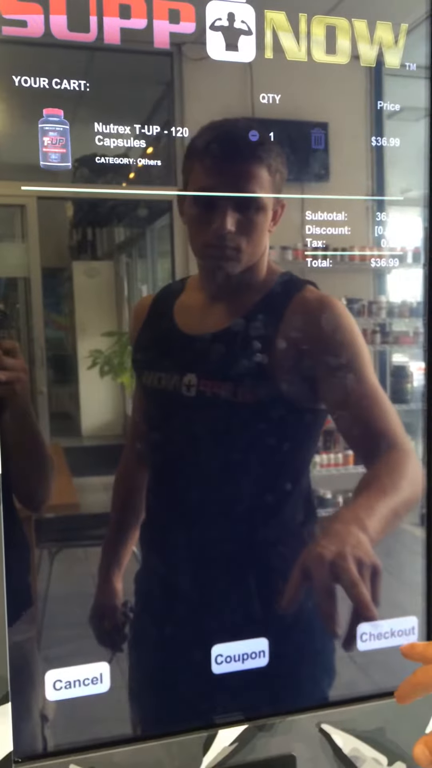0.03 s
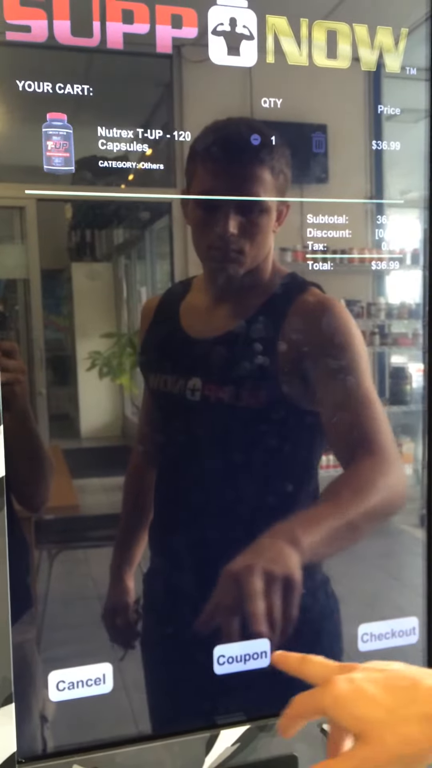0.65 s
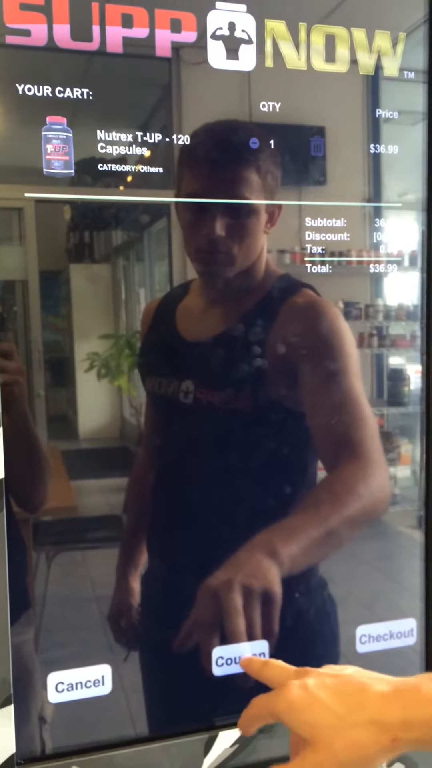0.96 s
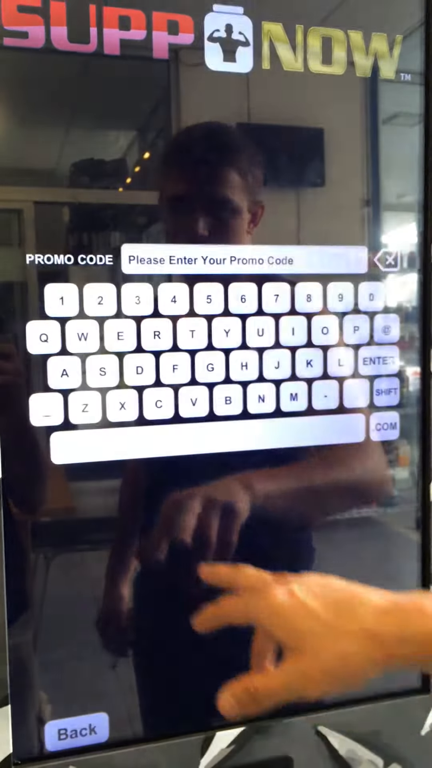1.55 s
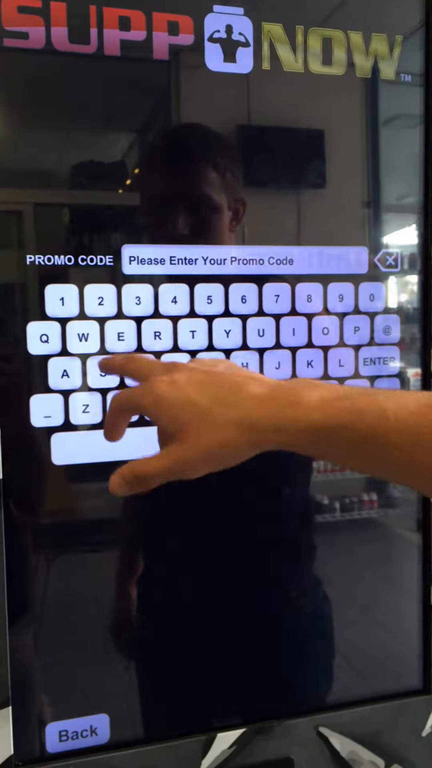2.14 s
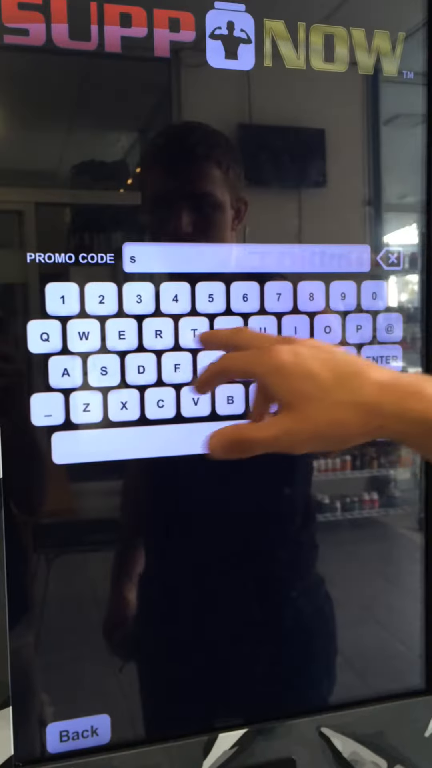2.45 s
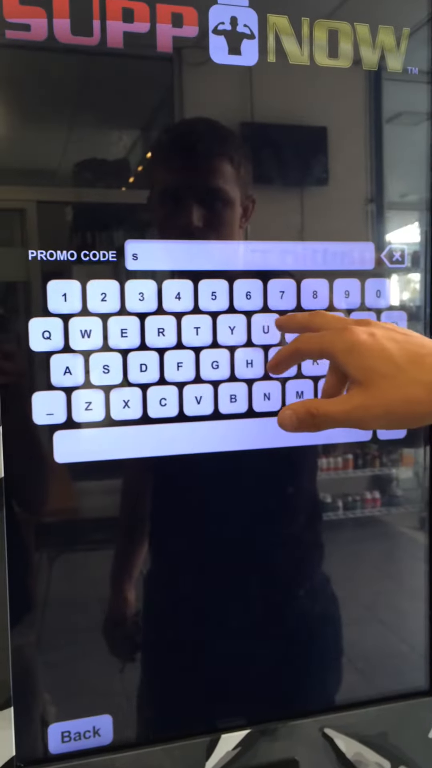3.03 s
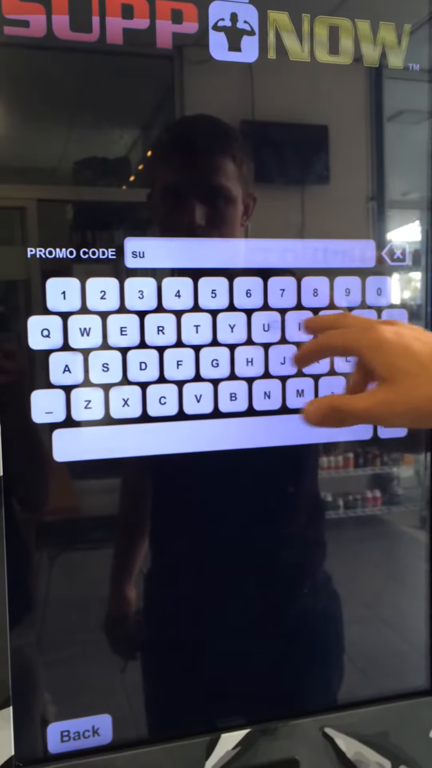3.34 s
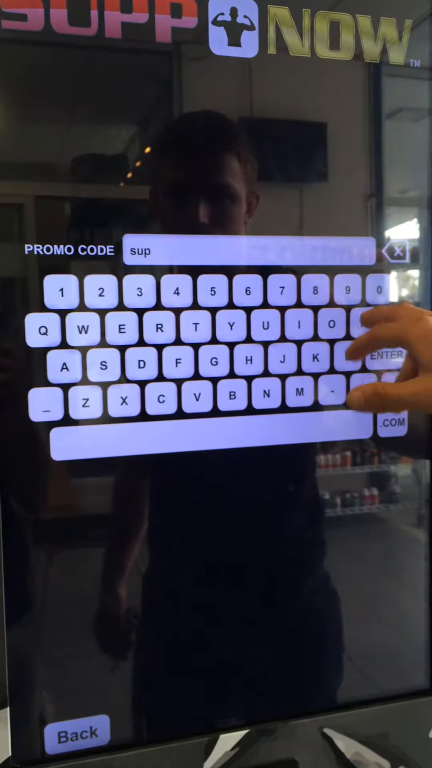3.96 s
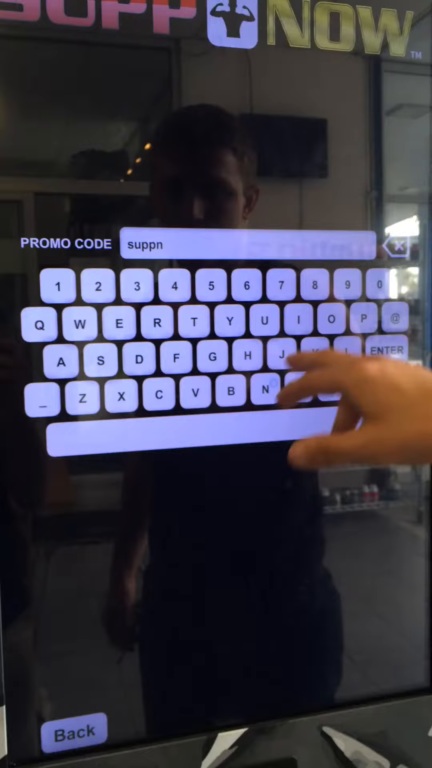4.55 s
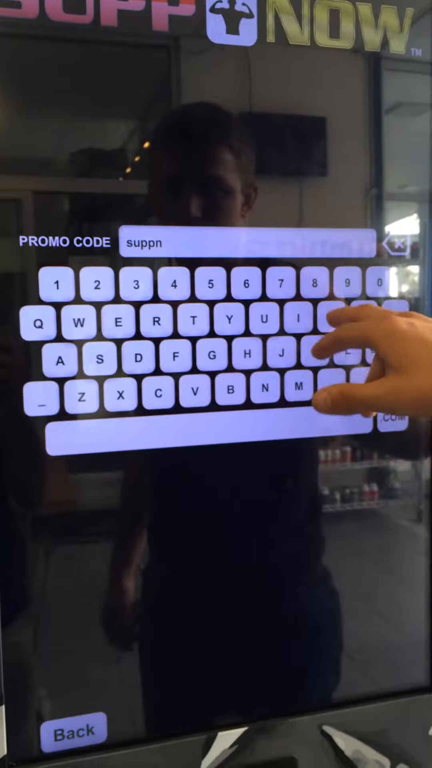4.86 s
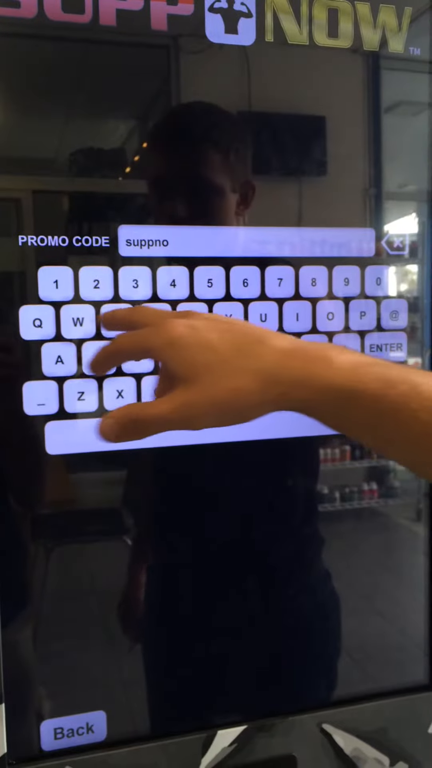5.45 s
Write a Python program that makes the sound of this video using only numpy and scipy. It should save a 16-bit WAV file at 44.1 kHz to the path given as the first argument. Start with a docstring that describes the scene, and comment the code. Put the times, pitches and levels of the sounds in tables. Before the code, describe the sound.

A vending machine hums steadily in a hard-floored lobby, with a thin compressor buzz and soft fan air, heard from a phone close by. After a second, a finger touches the big screen with faint swishes and a nail tick, and the pane clacks twice against its frame. Spaced, low thumps of typing follow. Around four seconds come another tick and a clack, then two last soft touches.

```python
"""A vending machine in a hard-floored lobby, heard from a phone close by.
From the start the machine hums, its compressor buzzes thinly and its fan pushes air.
A second in, a finger starts typing on the big touchscreen: each touch booms the panel, and skin
swishes on the glass. A fingernail ticks and the pane clacks twice against its frame, a lighter knock
between. Near four seconds come another tick, a clack and a faint knock, then the last touches."""
import sys
import numpy as np
from scipy import signal
from scipy.fft import rfft, irfft, next_fast_len
from scipy.io import wavfile
from scipy.ndimage import map_coordinates

SR = 44100
rng = np.random.default_rng(int(sys.argv[2]) if len(sys.argv) > 2 else 0)


def store_wav(level_fs):
    """Save 16-bit WAV to argv[1]."""
    pcm = np.round(np.clip(np.atleast_2d(level_fs), -1, 1) * 32767)
    wavfile.write(sys.argv[1], SR, pcm.T.astype(np.int16))


N = 246959
TIME = np.arange(N) / SR
RING_TIME = TIME[:SR]  # each blow gets one second to ring out

# The pane knocks on its frame. Each row: start in seconds, level in dB, hardness as tilt in dB per
# octave, jolt to the panel in dB, signed gain of a second boom 19.5 ms after the jolt.
CLACKS = [(1.2040, -3.5, 0, -28, 0.06), (1.285, -14.5, -3.5, -35, -0.2), (1.3390, 0, -0.96, -23, -1.06),
          (4.1697, -2, -0.5, -32, 0), (4.2680, -19, -7, -35.5, -0.1)]


def undb(db):
    """Decibels to gain."""
    return 10 ** (np.asarray(db) / 20)


def fade(t60):
    """One second of exponential decay, falling 60 dB in t60 seconds."""
    return np.exp(-np.log(1000) * RING_TIME / t60)


def colour(x, points):
    """Filter causally with a spectrum of (Hz, dB) points, joined over log frequency."""
    size = 2 * next_fast_len(len(x))
    hz = np.arange(size // 2 + 1) * SR / size
    point_hz, point_db = np.transpose(points)
    gain = undb(np.interp(np.log(np.maximum(hz, 1)), np.log(point_hz), point_db))
    cepstrum = irfft(np.log(gain))
    cepstrum[1:size // 2] *= 2  # fold to minimum phase
    cepstrum[size // 2 + 1:] = 0
    return irfft(rfft(x, size) * np.exp(rfft(cepstrum)))[:len(x)]


def band(x, lo_hz, hi_hz, order=1):
    """Band-pass."""
    return signal.sosfilt(signal.butter(order, [lo_hz, hi_hz], "band", fs=SR, output="sos"), x)


def walk(rate):
    """Random drift with a spread near 1, turning `rate` times a second."""
    knots = rng.standard_normal(256)
    return np.interp(TIME * rate, np.arange(len(knots)), knots)


def add(track, s, sound):
    """Mix a sound into a track at s seconds."""
    i = int(s * SR)
    track[i:i + len(sound)] += sound[:len(track) - i]


def tone(hz, db, flutter_db, wander_hz, wander_rate=12):
    """A running machine's tone, unsteady in level and pitch."""
    phase = 2 * np.pi * (np.cumsum(hz + wander_hz * walk(wander_rate)) / SR + rng.random())
    return np.sqrt(2) * undb(db + flutter_db * walk(7)) * np.sin(phase)


def drone(hz, width_hz, db):
    """A resonance shaken at random swells and fades."""
    shaken = band(rng.standard_normal(N), hz - width_hz / 2, hz + width_hz / 2)
    return undb(db) * shaken / np.std(shaken)


def hum():
    """Motor and mains hum while sheet metal drones in the air stream."""
    # Motor and mains tones. Each row: pitch in Hz, rms level in dB, flutter in dB, wander in Hz.
    tones = [(67.6, -64, -9, 2.38), (81.2, -58, 7.5, 0.47), (98.5, -63.5, 1.5, 2.7),
             (119.74, -45.5, -1, 0.12), (545, -87.5, 16, 0.77), (1455, -69.5, 1, 0.94)]
    # Sheet-metal resonances. Each row: centre in Hz, width in Hz, rms level in dB.
    sheets = [(158.9, 14, -55), (230.9, 10.5, -58)]
    return sum(tone(*row) for row in tones) + sum(drone(*row) for row in sheets)


def compressor(turn_hz=58.9, rattle_db=-63.5):
    """The same tiny rattle rings the shell on every shaft turn; thin wavering tones stand out."""
    # The compressor's whine. Each row: pitch in Hz, rms level in dB.
    whine_tones = [(3020, -83.5), (3198, -86), (3257, -87), (4651, -87), (4705, -83.5), (5001, -85),
                   (5346, -83.5), (5464, -89), (5814, -87.5), (6040, -88), (6568, -90), (7031, -89),
                   (7381, -91), (7671, -91), (7962, -86), (8021, -85), (8484, -88), (14955, -101)]
    # Shell resonances that colour the buzz. Each row: frequency in Hz, gain in dB.
    shell = [(2500, -20), (3100, 0), (3900, -14), (4800, -2), (6000, -2), (6900, -8), (7700, -6), (8000, 1),
             (8450, 2), (8900, -10), (10800, -14), (13000, -26)]
    size = int(SR / turn_hz)
    rattle = irfft(np.exp(2j * np.pi * rng.random(size // 2 + 1))) * np.sqrt(size)
    turns = np.cumsum(turn_hz * (1 + .0011 * walk(9.9))) / SR
    buzz = map_coordinates(rattle, [turns % 1 * len(rattle)], order=3, mode="grid-wrap")
    whine = sum(tone(hz, db, flutter_db=3.2, wander_hz=4, wander_rate=30) for hz, db in whine_tones)
    return undb(rattle_db) * colour(buzz, shell) + whine


def fan(rest_db=1.4, swell_db=2.5, swell_s=2.63, spread_s=0.15):
    """Broad air noise whose middle range flutters a little and swells once."""
    # Fan air in the lobby. Each row: frequency in Hz, density in dB per Hz before the middle is lifted.
    spectrum = [(20, -80.5), (48, -73), (95, -70.5), (175, -69.5), (260, -75), (520, -86), (1100, -91),
                (1600, -92.5), (2700, -98.5), (4000, -106.5), (8300, -110), (9400, -116), (11000, -116),
                (14000, -121)]
    air = colour(rng.standard_normal(N), spectrum) * np.sqrt(SR / 2)
    middle = band(air, 290, 3800)
    swell = np.exp(-((TIME - swell_s) / spread_s) ** 2)
    lift_db = rest_db + swell_db * swell + .5 * walk(12)
    return air + (undb(lift_db) - 1) * middle


def ring(modes):
    """Struck modes dying away."""
    return sum(undb(db) * fade(t60) * np.sin(2 * np.pi * hz * RING_TIME) for hz, db, t60 in modes)


def thump(db, tilt_db):
    """One blow on the panel; its evenly spaced low modes beat, so the boom throbs about every 35 ms."""
    # The panel's bending modes. Each row: frequency in Hz, relative level in dB, t60 in seconds.
    bending = [(51.3, -2.5, 0.34), (74, 2, 0.24), (100.1, 2.5, 0.42), (128.3, 4, 0.26), (155.35, 3, 0.25),
               (171.6, -16.5, 1), (200.6, -13, 0.58), (237, -32, 0.44), (320.3, -2.5, 0.16),
               (454, -22, 0.2)]
    modes = [(hz, mode_db + tilt_db * np.log2(hz / 140), t60) for hz, mode_db, t60 in bending]
    boom = band(ring(modes), 129, 162.4)  # the cabinet behind the panel favours one broad band
    lobby = band(rng.standard_normal(len(RING_TIME)), 97, 300, order=2) * fade(0.54) * (1 - fade(0.07))
    return undb(db) * (boom + undb(-5) * lobby)


def boom_pair(db, tilt_db, second_gain, lag_s=.0195):
    """A boom, and a second just after it that changes which low note of the panel rings on."""
    out = thump(db, tilt_db)
    add(out, lag_s, second_gain * thump(db, tilt_db))
    return out


def panel(rebound_s=.037, rebound_db=-24.5):
    """Fingertips boom the panel; each knock of the pane jolts it too, and it swings back."""
    # Finger on the panel. Each row: start in seconds, level in dB, direction (1 in, -1 springing back),
    # hardness as tilt in dB per octave, signed gain of a second boom 19.5 ms later.
    touches = [(1.0403, -27.5, -1, 4, 0.22), (1.1250, -31, 1, 1, 0), (1.1692, -31, -1, -1, 0.12),
               (2.1791, -28.5, 1, -1.5, -1.58), (2.308, -38, -1, -2, 0.048), (3.2391, -20.5, 1, -2, 0.045),
               (3.7638, -20.5, 1, 3.5, 0.077), (4.0108, -21, 1, 2, 0.14), (4.4398, -24, 1, -1, -0.066),
               (4.9169, -34.5, 1, 5, 0.054)]
    out = np.zeros(N)
    for s, db, direction, tilt_db, second_gain in touches:
        add(out, s, direction * boom_pair(db, tilt_db, second_gain))
    for s, db, _, jolt_db, second_gain in CLACKS:
        add(out, s, -boom_pair(jolt_db, tilt_db=4, second_gain=second_gain))
        add(out, s + rebound_s, thump(db + rebound_db, tilt_db=-1))
    return out


def skim():
    """Soft swishes as skin rubs over the glass."""
    # Each row: middle and spread in seconds, gain in dB, low and high band edges in Hz.
    swishes = [(1.1, 0.061, -47, 2170, 3000), (1.12, 0.027, -19, 212, 270), (1.159, 0.062, -38, 440, 1410),
               (4.96, 0.11, -55, 5800, 6900)]
    out = np.zeros(N)
    for s, spread_s, db, lo_hz, hi_hz in swishes:
        envelope = np.exp(-((TIME - s) / spread_s) ** 2)
        out += undb(db) * envelope * band(rng.standard_normal(N), lo_hz, hi_hz, order=2)
    return out


def burst(contact_t60, scatter_db, scatter_t60, room_db, room_t60):
    """A hard contact, its reflections off the cabinet, then the lobby's tail."""
    scatter = undb(scatter_db) * fade(scatter_t60)
    room = undb(room_db) * fade(room_t60)
    power = fade(contact_t60) ** 2 + scatter ** 2 + room ** 2
    return np.sqrt(power) * rng.standard_normal(len(RING_TIME))


def nail():
    """A fingernail meets the glass in light, bright ticks."""
    # Each row: start in seconds, relative level in dB.
    ticks = [(1.1282, 0), (4.1028, -6)]
    # The tick's colour. Each row: frequency in Hz, gain in dB.
    spectrum = [(300, 2), (1000, 6), (2000, 2), (3500, -2), (6000, 1), (10500, -2), (15000, -11)]
    out = np.zeros(N)
    for s, db in ticks:
        add(out, s, undb(db - 45) * colour(burst(.02, -6, .08, -17, .4), spectrum))
    return out


def pane(chatter_s=0.006, chatter_db=-5):
    """Glass knocks on the frame and chatters once: two cracks and the ring of the metal."""
    # Modes of pane and frame. Each row: frequency in Hz, relative level in dB, t60 in seconds.
    modes = [(317, -11, 0.29), (455.5, 4, 0.19), (369, -3.5, 0.21), (553, -5.5, 0.5), (639, -9, 0.58),
             (726, -10, 0.093), (904, 0, 0.091), (1012, -2.5, 0.14), (1187, -8, 0.25), (1230, -12, 0.21),
             (1414, -5, 0.11), (1876, -6, 0.15), (1970, -5.5, 0.094), (2234, -10.5, 0.12), (2790, -21, 0.1),
             (2936, -10.5, 0.063), (3280, -7, 0.055), (3490, -20, .08)]
    # The knock's colour. Each row: frequency in Hz, gain in dB.
    spectrum = [(150, -3.5), (350, 5), (620, -1), (800, 2), (1000, -3.5), (1430, 4.5), (1640, -5),
                (1900, -6), (2500, -9.5), (3400, -13), (4600, -19), (7800, -20.5), (11000, -32.5),
                (15000, -42)]
    out = np.zeros(N)
    metal = undb(-38) * (ring(modes[::2]) - ring(modes[1::2]))  # alternate modes swing opposite ways
    for s, db, tilt_db, *_ in CLACKS:
        contact = burst(0.011, -9, 0.094, -16.5, 0.63)
        add(contact, chatter_s, undb(chatter_db) * burst(0.0038, -12, 0.14, -37, 0.2))
        tilted = [(hz, point_db + tilt_db * np.log2(hz / 1400)) for hz, point_db in spectrum]
        crack = colour(contact, tilted) * (1 - fade(0.00089))
        add(out, s, undb(db) * (metal + undb(-16) * crack))
    return out


def scene():
    """Touches over the running machine, close up and in mono."""
    return (hum() + panel() + pane() + nail() + skim() + compressor() + fan())[None]


def record(dry):
    """The phone, close to the screen, cuts the top above 15.3 kHz."""
    return signal.sosfilt(signal.ellip(10, .2, 80, 15300, fs=SR, output="sos"), dry)


dry = scene()
out = record(dry)
store_wav(out)
```